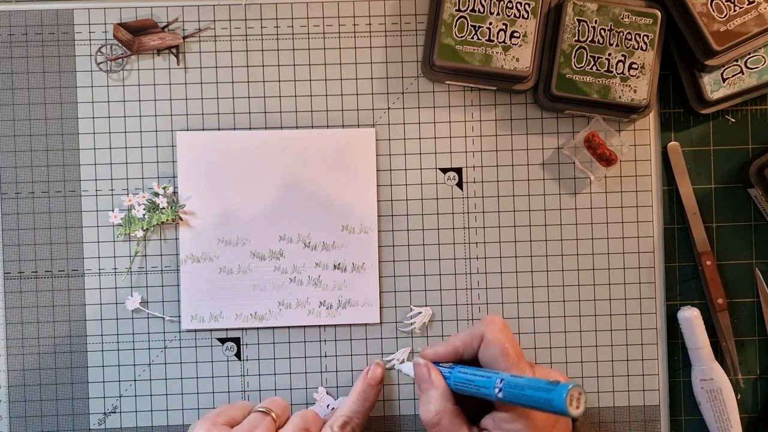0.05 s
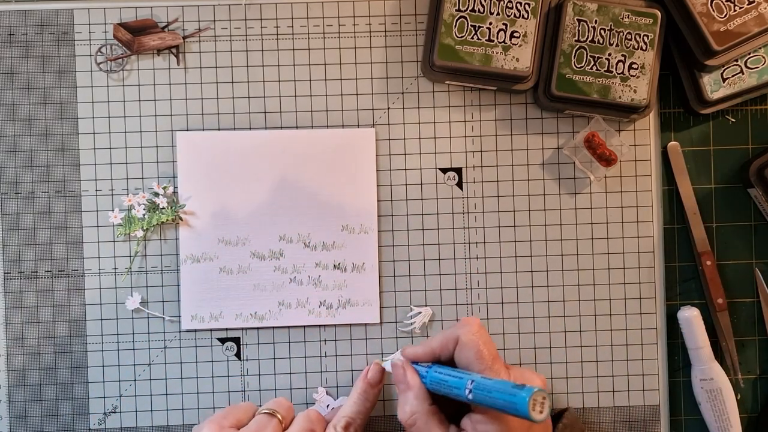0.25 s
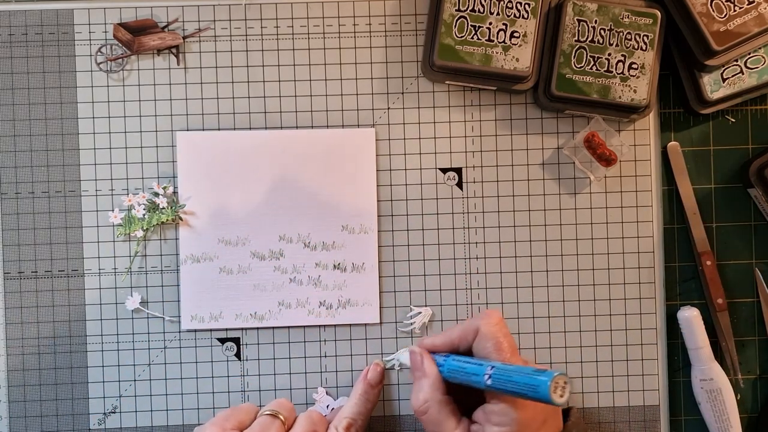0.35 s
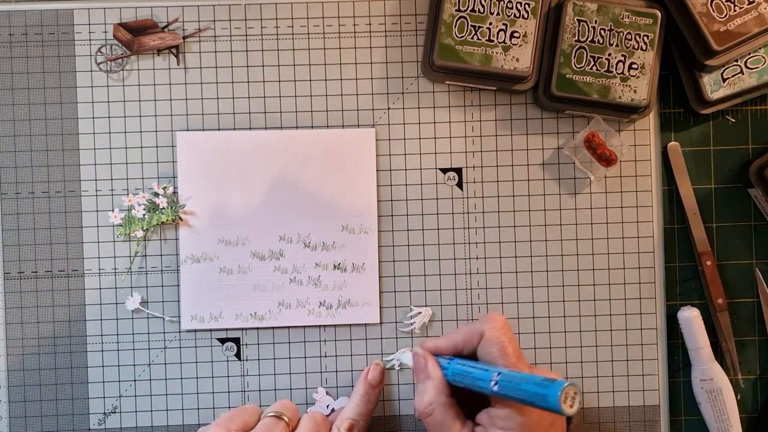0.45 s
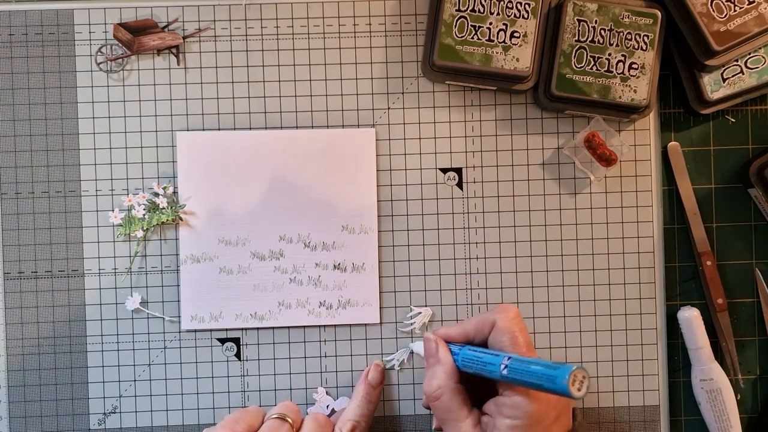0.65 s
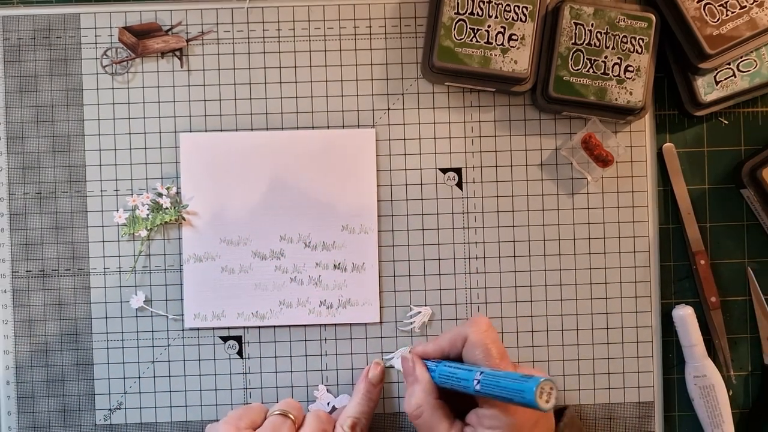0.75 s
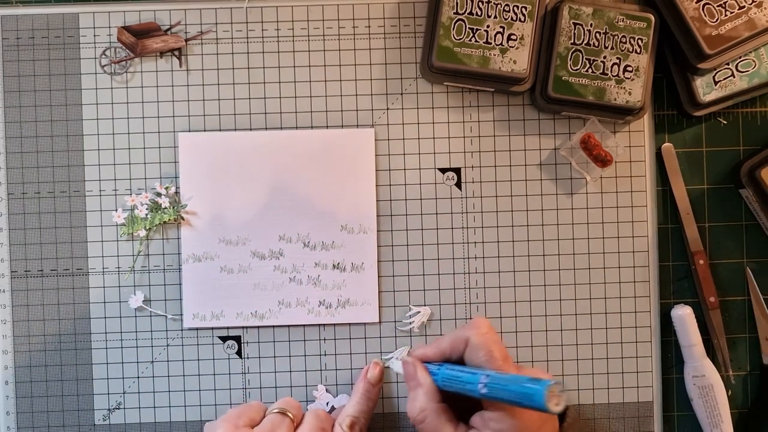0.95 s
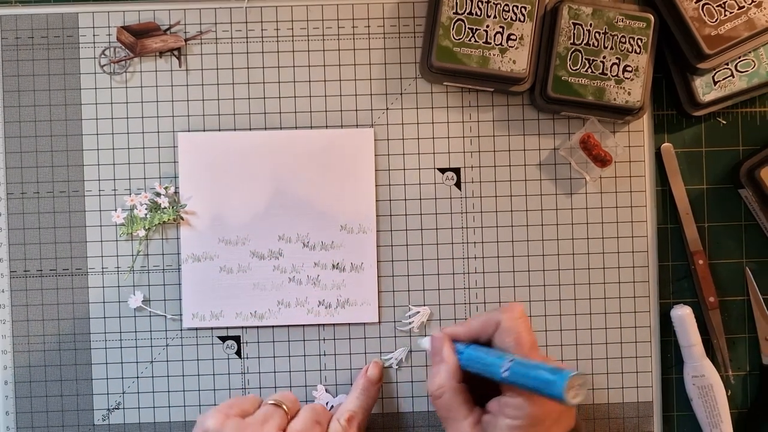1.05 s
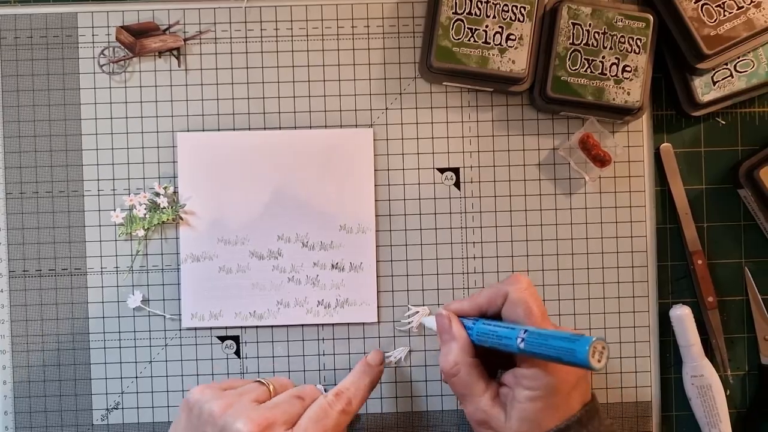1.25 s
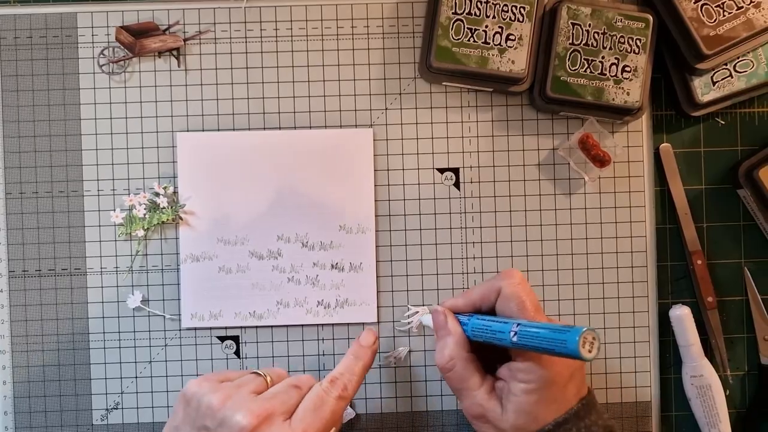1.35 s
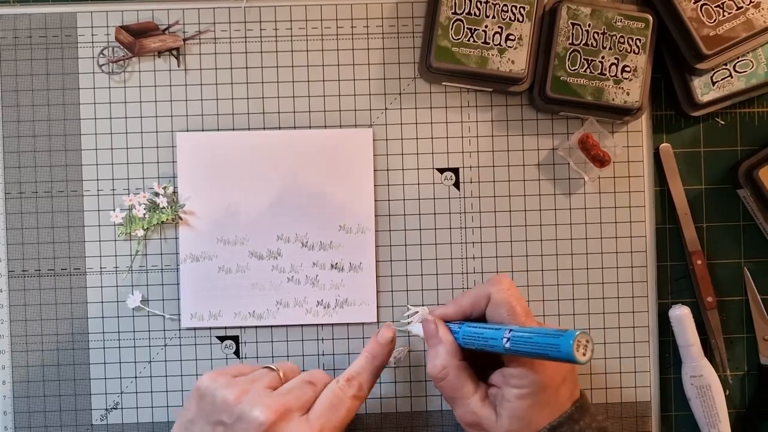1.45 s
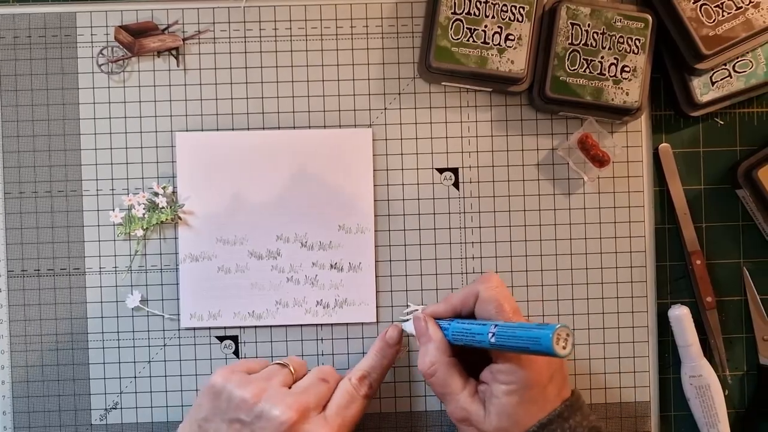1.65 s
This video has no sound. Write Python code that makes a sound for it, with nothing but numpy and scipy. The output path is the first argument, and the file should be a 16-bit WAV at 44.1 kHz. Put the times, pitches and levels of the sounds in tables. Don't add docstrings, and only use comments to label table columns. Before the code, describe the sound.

Four light pen dabs tick, thump and scratch over paper, then a small scrap snaps free

```python
import sys
import numpy as np
from scipy import signal
from scipy.fft import rfft, irfft
from scipy.io import wavfile
from scipy.ndimage import uniform_filter1d

SR = 44100
rng = np.random.default_rng(int(sys.argv[2]) if len(sys.argv) > 2 else 0)


def put_to_file(sound):
    columns = np.atleast_2d(sound).T
    safe = np.clip(columns, -1, 1)
    whole_steps = np.round(safe * 32767)
    wavfile.write(sys.argv[1], SR, whole_steps.astype(np.int16))


def gain_from_db(level_db):
    decades = np.asarray(level_db, float) / 20
    return 10 ** decades


N = 74970
T = np.arange(N) / SR


def level(x, db):
    return x * gain_from_db(db) / np.sqrt(np.mean(x ** 2))


def ring(x, hz, t60_s):
    pole = np.exp((2j * np.pi * hz - np.log(1000) / t60_s) / SR)
    return signal.lfilter([1], [1, -pole], x).imag


def body(x, modes, flip=-1):
    total = 0
    for k, (hz, db, t60_s, pan_db) in enumerate(modes):
        gain = gain_from_db(db + np.array([[pan_db], [-pan_db]]) / 2)
        total = total + flip ** k * gain * ring(x, hz, t60_s)
    return total


def colour(x, points):
    hz, db = np.array(points).T
    f = np.maximum(np.arange(N // 2 + 1) * SR / N, 1)
    return irfft(rfft(x) * gain_from_db(np.interp(np.log(f), np.log(hz), db)), N)


def above(x, hz):
    return signal.sosfilt(signal.butter(4, hz, "high", fs=SR, output="sos"), x)


def hits(times_s, sizes):
    x = np.zeros(N)
    x[(np.array(times_s) * SR).astype(int)] = sizes
    return x


def soften(x, s):
    push = np.hanning(int(s * SR))
    return np.convolve(x, push / push.sum())[:N]


def walk(rate_hz):
    k = int(SR / rate_hz)
    return level(uniform_filter1d(uniform_filter1d(rng.standard_normal(N), k), k), 0)


# f/Hz, density/(dB per Hz)
AIR = [(150, -45), (260, -6), (373, -9), (406, -5.5), (483, -10.5), (822, -10), (993, -15.5), (5080, -19.5),
       (15800, -43)]
# f/Hz, density/(dB per Hz)
RUMBLE = [(12, -22), (25, -0.5), (45, -23.5), (85, -6.5), (140, -7), (200, -14), (260, -33), (400, -59)]
# f/Hz, level/dB, wander/Hz
HUM = [(120, -67.5, 2.8), (163.2, -71.5, 2.15), (220, -90.5, 10)]


def room_tone():
    opposed = np.array([[1], [-1]])
    mid, side = colour(rng.standard_normal((2, N)), AIR)
    side = signal.sosfilt(signal.butter(1, 485, "high", fs=SR, output="sos"), side)
    air = level(mid + 1.12 * side * opposed, -77) * gain_from_db(walk(9))

    hum = 0
    for hz, db, wander_hz in HUM:
        gain = np.sqrt(2) * gain_from_db(db + 1.1 * walk(18))
        hum = hum + gain * np.sin(2 * np.pi * np.cumsum(hz + wander_hz * walk(9.2)) / SR)

    low, apart = colour(rng.standard_normal((2, N)), RUMBLE)
    swell_db = np.interp(T, [0, .15, 1.15, 1.3], [14, 0, 9.5, 5])
    rumble = level(low + 0.54 * apart * opposed, -74.5) * gain_from_db(swell_db)
    return air + rumble + hum * gain_from_db([[.6], [-.6]])


def swell(x, hz, rise_t60_s, t60_s):
    return ring(ring(x, hz, rise_t60_s), hz, t60_s) * 2 * np.log(1000) / rise_t60_s / SR


TOUCH_S = (.2305, .528, .7625, .9865)
# lift t/s, thump/dB, lift/dB, tick/dB, upper table ring/dB
DABS = [
    (0.407, -38.5, -66, -56.5, -8),
    (0.656, -38.5, -58.5, -52.5, -1),
    (.845, -40, -81, -58, -7.5),
    (1.052, -36.5, -78, -54, 0),
]
# f/Hz, level/dB, t60/s
TABLE = [(29.8, -1, 0.44), (74, -30, 0.033), (131.5, -6, 0.31), (148, -24, 0.3)]


def thumps():
    RISE_T60_S, PUSH_S, LEAN_S = 0.02, 0.0029, .023
    ARM_HZ, ARM_T60_S, ARM_DB = 55.8, 0.13, 20.5
    lift_s, thump_db, lift_db, _, upper_db = np.array(DABS).T
    force = hits(TOUCH_S, gain_from_db(thump_db)) - hits(lift_s, gain_from_db(lift_db))
    arm = swell(soften(force, LEAN_S), ARM_HZ, ARM_T60_S, ARM_T60_S)
    push = soften(force, PUSH_S)
    table = sum(gain_from_db(db) * swell(push, hz, RISE_T60_S, t60_s) for hz, db, t60_s in TABLE)
    upper = hits(TOUCH_S, gain_from_db(thump_db + upper_db - 16.5))
    table = table + swell(upper, 215.5, RISE_T60_S, 0.21)
    slap = hits([.815], gain_from_db(-68.5))
    table = table + swell(slap, 386.5, RISE_T60_S, 0.24)
    return (table - gain_from_db(ARM_DB) * arm) * gain_from_db([[1.1 / 2], [-1.1 / 2]])


def slips():
    SLIPS_PER_S = 9000
    return level((rng.random(N) < SLIPS_PER_S / SR) * rng.standard_normal(N), 0)


def drive(x, modes, db):
    return x * gain_from_db(db) / np.std(body(x, modes))


def spaced(x):
    LEFT_LEAD_S = .00013
    return np.array([np.interp(T + LEFT_LEAD_S, T, x[0]), x[1]])


# t/s, sliding level/dB, pressure on mat/dB
DRAGS = [
    [(0.231, -52.5, -18), (0.239, -73, -20.5), (0.251, -70.5, 26.5), (0.269, -60.5, -11),
     (0.283, -70.5, 21.5), (0.319, -62, 18.5), (0.349, -53, 3.5), (0.395, -55, -0.5), (0.45, -102, -17)],
    [(0.529, -62, 9), (0.555, -82.5, 36.5), (0.579, -50.5, 5.5), (0.617, -48, 9.5), (0.641, -56.5, 3),
     (0.687, -85.5, -25), (0.7, -117, -21)],
    [(0.763, -50, 11.5), (0.773, -60.5, 6), (0.787, -59.5, 19), (0.799, -48.5, 7.5), (0.827, -48, -3.5),
     (0.893, -90.5, -9), (0.9, -80, -21)],
    [(0.987, -64, 22.5), (1.005, -57, 16.5), (1.015, -48, 2.5), (1.029, -49, 6), (1.077, -85.5, 1),
     (1.1, -78.5, 4)],
    [(1.1, -80, 22), (1.118, -77.5, 8), (1.25, -80, -1.5), (1.31, -81, 6), (1.318, -78.5, 8.5),
     (1.334, -77, -5), (1.36, -73.5, 1)],
]
# t/s, peak level/dB
CATCHES = [
    (.268, -44),
    (.304, -42),
    (.333, -42),
    (.366, -44.5),
    (.558, -43),
    (.574, -39.5),
    (.635, -35.5),
    (.783, -36.5),
    (.824, -35.5),
    (1.026, -34),
]
# f/Hz, level/dB, t60/s, left-right/dB
MAT = [(603, -9.5, 0.05, 3.5), (721, -9, 0.059, -0.5), (796, 1, 0.06, 1), (826.6, 2, 0.064, 2),
       (972, -10.5, 0.063, 3), (1050, -15.5, .05, 1), (1147, -8.5, 0.092, 2.5), (1243, -11, 0.079, 4)]
PEN_HZ = (1559, 2012, 2506, 2658, 2760, 3180, 3380, 4120, 5824, 6130, 7050, 8620)
# level/dB, t60/s, left-right/dB
PEN = [(1, .08, 2.5), (-3, .075, 2.5), (-10, .07, 1.5), (-6, .07, 1.5), (-9, .06, 1), (-2, .055, 0),
       (-6, .03, 0), (-4, .035, -1), (-8, .05, -1), (-5, .025, -1), (-12, .03, -1), (-11, .025, -1)]
# f/Hz, density/(dB per Hz)
FIBRE = [(1000, -35), (1450, -12), (3250, -10), (3750, -21), (5000, -17), (6400, -10), (9500, -19),
         (15700, -25)]
# f/Hz, level/dB, t60/s, left-right/dB
KNOCK = [(830, 0, .014, 1), (1150, -11, .012, 1), (3200, -16, .01, 0), (6100, -26, .006, -1)]
# f/Hz, level/dB, t60/s, left-right/dB
TICK = [(3400, 0, .03, 0), (4250, -2, .03, -1), (6100, -3, .02, -1), (8600, -6, .012, 0),
        (12000, -12, .006, 2)]


def drags():
    slide, press = 0, 0
    for curve in DRAGS:
        s, slide_db, press_db = np.array(curve).T
        slide = slide + gain_from_db(np.interp(T, s, slide_db, -140, -140))
        press = press + gain_from_db(np.interp(T, s, slide_db + press_db, -140, -140))
    low = slips() * gain_from_db(3 * walk(150))
    high = slips() * gain_from_db(2.5 * walk(200))
    ticks = hits(TOUCH_S, gain_from_db(np.array(DABS)[:, 3]))
    catch_s, catch_db = np.array(CATCHES).T
    catches = hits(catch_s, gain_from_db(catch_db))

    mat_force = drive(low, MAT, -7.5) * press + gain_from_db(-2.5) * ticks + gain_from_db(-16) * catches
    mat = body(mat_force, MAT) + body(catches, KNOCK)

    barrel = np.c_[PEN_HZ, PEN]
    pen_force = drive(high, barrel, -3) * slide + gain_from_db(-7.5) * ticks + gain_from_db(-18) * catches
    pen = above(body(pen_force, barrel), 870)

    FIBRE_ALIKE = .5
    grain = np.sqrt(FIBRE_ALIKE) * level(high, 0) + np.sqrt(1 - FIBRE_ALIKE) * rng.standard_normal((2, N))
    fibres = level(colour(grain, FIBRE), -6) * slide
    return above(mat, 560) + spaced(pen + fibres + gain_from_db(-6.5) * body(ticks, TICK))


# f/Hz, level/dB, t60/s, left-right/dB
SCRAP = [(1195, -17, 0.046, 0), (1493, -9, 0.029, 3), (2220, -28, 0.032, 26), (3130, -0.5, 0.0086, 9),
         (3557, 0, 0.013, 3), (4110, 7, 0.0064, -1), (5900, -11.5, 0.0019, -17), (8400, -23, .004, 18),
         (13200, -34, 0.002, 28)]
SNAP_S = (1.4126, 1.4141, 1.4172)
SNAP_DB = (-36.5, -41, -45)


def scrap():
    START_S, END_S, PEEL_DB = 1.4016, 1.412, -54
    paper = level(body(rng.standard_normal(N), SCRAP), 0)
    crackle = level(np.diff(rng.standard_normal((2, N + 1))), 0)
    gate_s = [START_S, START_S + .001, END_S, END_S + .008, END_S + .05]
    peel = level(paper + crackle, PEEL_DB) * np.interp(T, gate_s, [0, 1, .5, .2, 0])
    snaps = soften(hits(SNAP_S, -gain_from_db(np.array(SNAP_DB))), .00013)
    return above(peel + gain_from_db(-7) * body(snaps, SCRAP, 1), 1100)


def room_tail(work):
    ROOM_DB, ROOM_T60_S, n = -11.5, 0.1, SR // 4
    tail = rng.standard_normal((2, n)) * np.exp(-np.log(1000) * T[:n] / ROOM_T60_S)
    tail = level(signal.lfilter([1], [1, -.6], tail), ROOM_DB) / np.sqrt(n)
    return signal.fftconvolve(work, tail, axes=1)[:, :N]


def scene():
    work = drags() + scrap()
    return work + room_tail(work) + thumps() + room_tone()


def band_limit(x):
    return signal.sosfilt(signal.butter(12, 16400, fs=SR, output="sos"), x)


def record(dry):
    TOP_HZ = 15850
    mix = signal.sosfilt(signal.ellip(10, .2, 80, TOP_HZ, fs=SR, output="sos"), dry)
    return band_limit(mix)


dry = scene()
out = record(dry)
put_to_file(out)
```